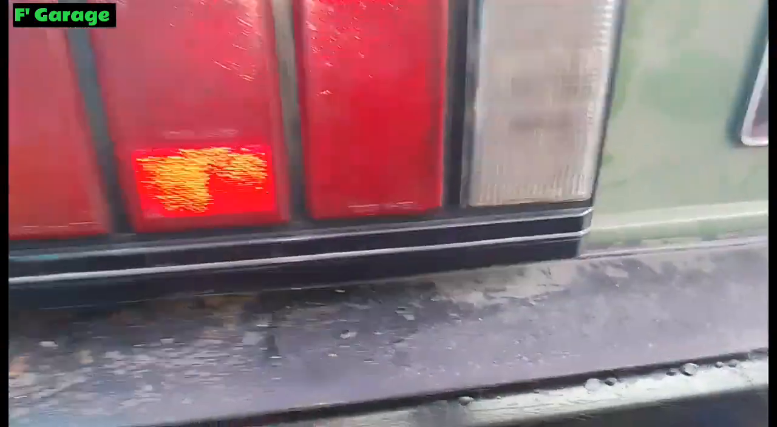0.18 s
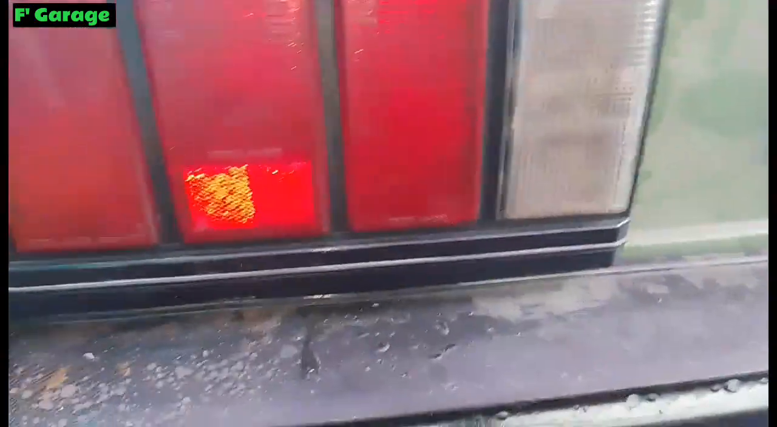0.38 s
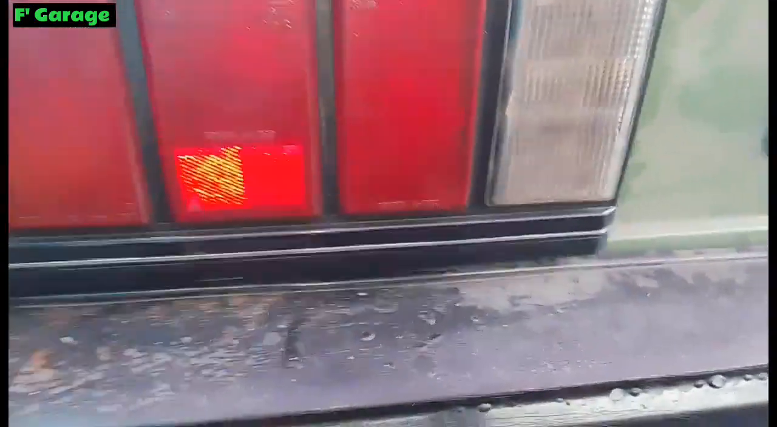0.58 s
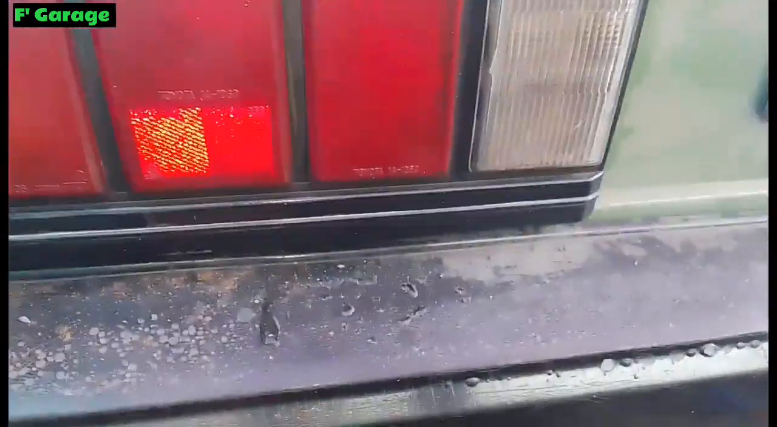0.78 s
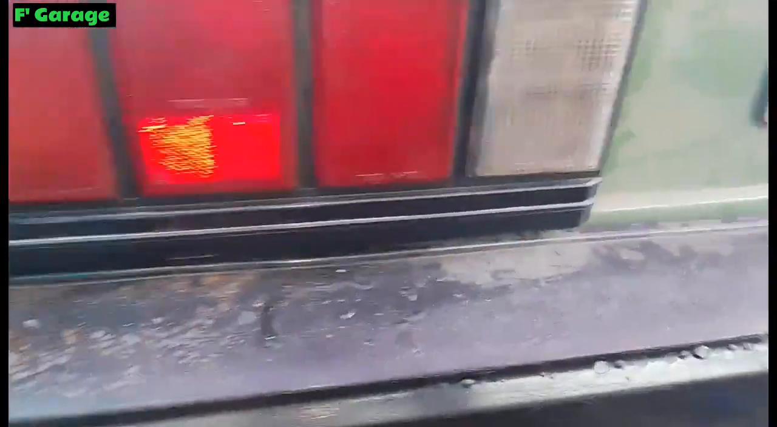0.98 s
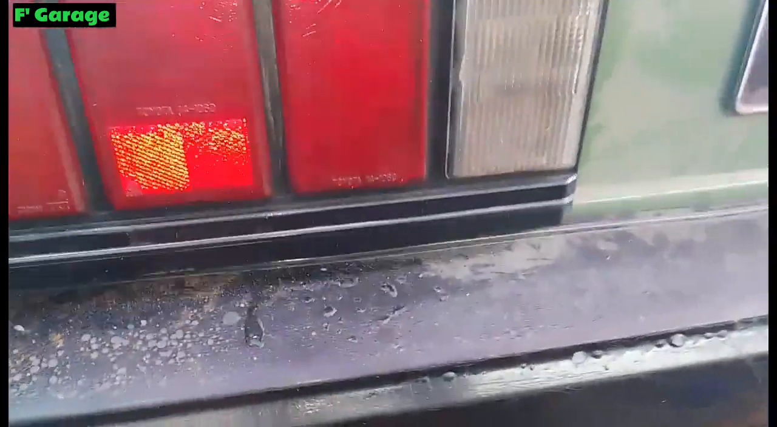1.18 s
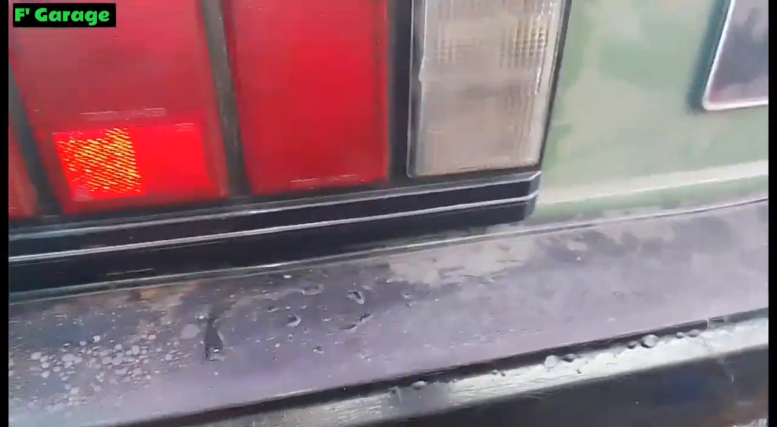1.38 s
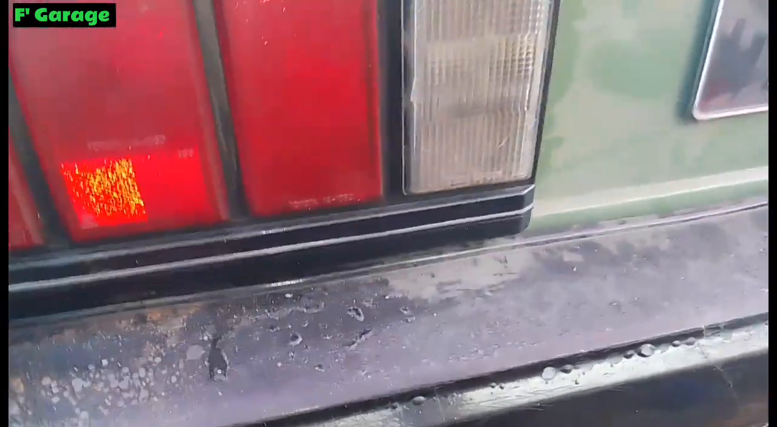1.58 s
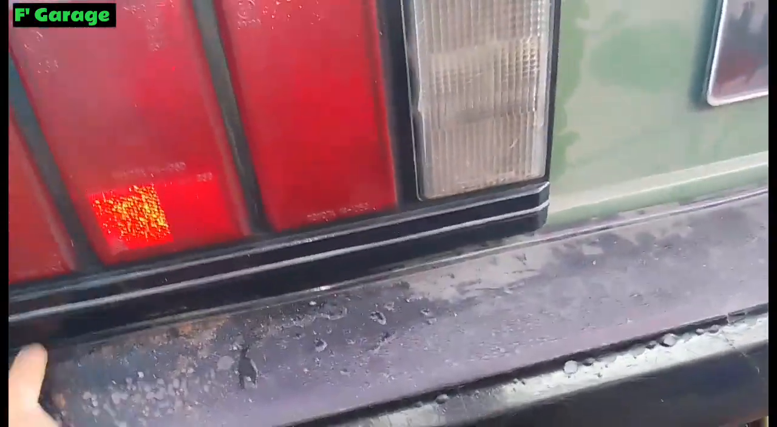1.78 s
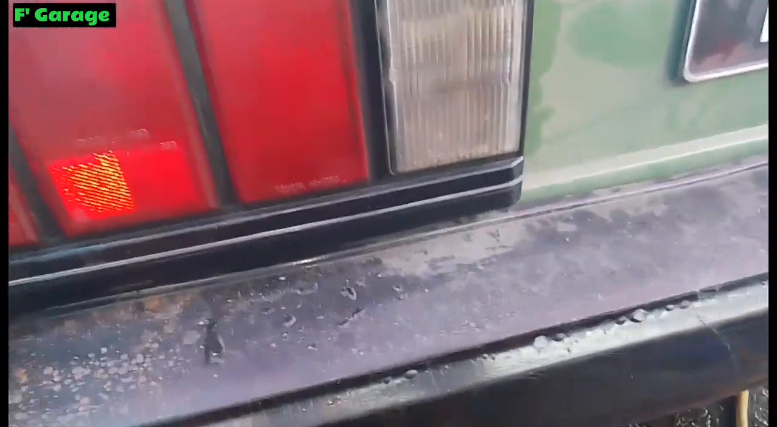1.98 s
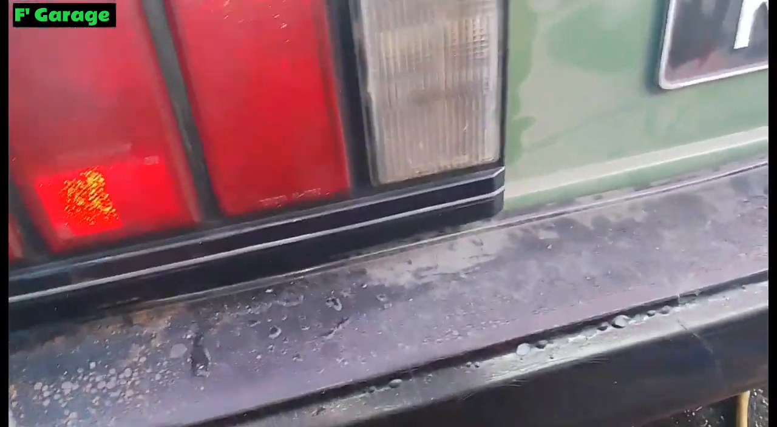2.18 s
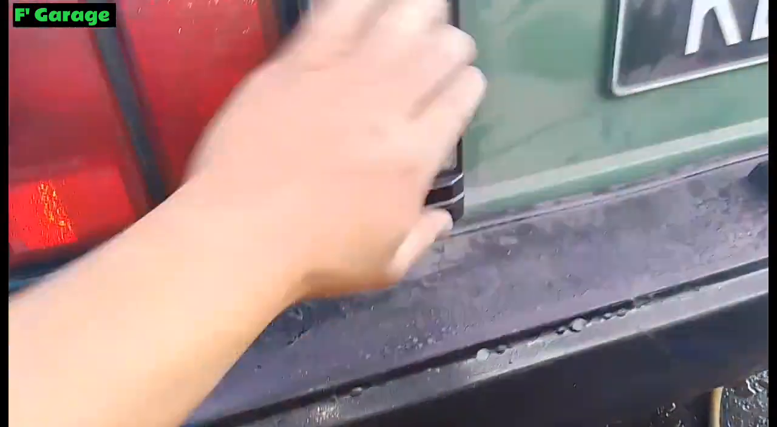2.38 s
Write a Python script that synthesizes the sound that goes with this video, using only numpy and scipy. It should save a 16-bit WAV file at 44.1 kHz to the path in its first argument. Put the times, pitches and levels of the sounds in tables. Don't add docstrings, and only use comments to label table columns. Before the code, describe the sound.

Rapid sharp knocks on hollow plastic car lamp lenses, a pause, then a quick finger slap

```python
import sys
import numpy as np
from scipy import signal
from scipy.io import wavfile
from scipy.ndimage import uniform_filter1d

SR = 44100
rng = np.random.default_rng(int(sys.argv[2]) if len(sys.argv) > 2 else 0)


def how_loud(loudness_db):
    steps = np.asarray(loudness_db, float) / 20
    return 10 ** steps


def to_wav(sig):
    pcm = np.clip(np.atleast_2d(sig), -1, 1) * 32767
    pcm = np.round(pcm).astype(np.int16)
    wavfile.write(sys.argv[1], SR, pcm.T)


N = 108045

# start_s, level_db, thud_db, edge_db, knock_db
TAPS = [(0.046, -22.5, 4, -5, 2), (0.055, -14, 9.5, -9.5, -18), (0.075, -19, 14.5, -3.5, -16),
        (0.192, -13.5, -8, -11, -6), (0.226, -13, 11, -12, 9), (0.232, -9, 11, -1.5, -10),
        (0.28, 2.5, -28, 0, 7.5), (0.354, -4, 4, -1.5, -13), (0.367, -10.5, 13, -2, -9),
        (0.397, -9, 4.5, 7.5, -1), (0.512, -33.5, 26.5, -10, 19), (0.552, -7, -22, -2, 2),
        (0.563, -13.5, -26, -13, 6), (0.581, -6.5, 6.5, 12.5, -17), (0.607, -0.5, -13, 4.5, 2),
        (0.677, -11.5, -8, 6, 12.5), (0.727, -6, 7.5, 1.5, 3.5), (0.94, -4.5, 2.5, 6, 1.5),
        (0.952, -18, -5, -19, 12), (0.957, -9.5, 14, 8, -22), (0.963, -4.5, -3.5, -2, 1.5),
        (0.981, -10, -14, -28, -27),
        (1.053, -8.5, 7.5, 1, -4), (1.068, -14, 9, 2.5, 4), (1.076, -10, 12.5, 5, -2),
             (1.094, -12, -3, 0, -23), (1.114, -4.5, -5, 0.5, -5.5), (1.237, -13.5, 8.5, -4, 2.5),
             (1.252, -6, -9, 7, -5), (1.271, -11.5, 13, 5, -15), (1.335, -13.5, 15.5, -18, 8.5),
             (1.362, -14, 7, 6.5, -5), (1.386, -10, 10.5, 3, 5), (1.433, -7.5, 1, -14, 10.5),
             (1.597, -29, 11, -1, 1.5)]
# start_s, level_db, chatter_s, knock_db, edge_db
CHATTER_BLOWS = [(.058, -29.5, 0.029, 7, -15), (.195, -24, 0.083, 3.5, -7.5), (.244, -3, 0.022, 1, 6),
                 (.282, -6, 0.012, -0.5, 1.5), (.300, -19.5, 0.049, -0.5, -5.5),
                 (0.358, -16.5, 0.041, 2, -4.5), (.551, -16, 0.0073, 0.5, -0.5),
                 (0.579, -3.5, 0.0098, 1.5, 2), (0.61, -11.5, 0.0051, 11.5, 3), (.677, -3.5, 0.024, -1, 6),
                 (0.945, -10, 0.021, -1, 1), (1.054, -15.5, 0.068, 2.5, -5),
                 (1.254, -9.5, 0.069, -1.5, -1.5), (1.304, -4, 0.016, -2, 4),
                 (1.340, -26.5, 0.031, 10.5, -3), (1.386, -3.5, 0.029, 1, 5)]
# start_s, level_db, thud_db, edge_db, knock_db
FINGER_SLAP = [(2.100, -30, 18, -8, 11), (2.104, -32, 20, -14, 11), (2.121, -24.5, -16, 4, 5.5),
               (2.152, -7.5, 3.5, 0, -12), (2.155, -10, 8, -3, -25), (2.162, -3, 2.5, 2.5, -16),
               (2.172, -9, 1, 0.5, -4), (2.177, -12, -6, -5, 2), (2.188, -8, -4, 0, -0.5),
               (2.197, -26, 7.5, -9, 0), (2.207, -33, 9, -17, -7)]
# start_s, pitch_hz, level_db, driven_s
STANDOUT_MODES = [(.246, 1870, -11.5, 0.0061), (.254, 2128, -8.5, 0.0091), (.250, 4840, -20, 0.013),
                  (.264, 753, -16, 0.0088), (0.271, 5670, -26, 0.024), (.280, 630, -12.5, 0.0083),
                  (.294, 620, -14, .003), (.551, 2060, -20, 0.0067), (.233, 4800, -39, .01),
                  (.236, 1930, -26, 0.009), (.965, 5100, -32.5, 0.0057), (.563, 2100, -24, .006),
                  (.578, 773, -10.5, .014), (.579, 555.4, -15.5, 0.039), (.579, 1005, -13.5, 0.015),
                  (.580, 179, -18.5, 0.035), (.581, 1950, -23.5, .024), (0.585, 1686, -19, 0.015),
                  (.605, 764, -18, 0.014), (.679, 943, -15.5, .014), (.680, 1828, -22, 0.017),
                  (0.683, 4620, -26, .018), (0.693, 351.4, -12.5, 0.019), (.698, 800, -17, 0.018),
                  (.940, 332, -18.5, .03), (.944, 802, -23, 0.022), (.955, 1930, -28, 0.023),
                  (1.305, 1942, -16, 0.013), (1.310, 4964, -24.5, 0.012), (1.310, 1410, -22.5, 0.013),
                  (1.312, 2082, -17.5, 0.012), (1.314, 162, -16, 0.025), (1.388, 935, -20, 0.009),
                  (1.390, 2050, -24, .015), (1.392, 1865, -19.5, 0.029), (1.412, 385, -17, 0.013),
                  (2.099, 235, -23, 0.0087), (2.100, 1900, -42, 0.0092), (2.122, 1660, -33, 0.0052),
                  (2.154, 1944, -29, .022), (2.152, 410, -23, 0.0043), (2.171, 388, -16.5, 0.0047),
                  (2.186, 466, -20, 0.0044)]
# pitch_hz, level_db, t60_s
LENS_MODES = [(1279, -4.5, 0.024), (1520, -5.5, 0.033), (1901, -2, 0.033), (2099, -6.5, 0.06),
              (2440, -8, 0.025), (2955, -9.5, 0.054), (3460, -6.5, 0.016)]
# pitch_hz, level_db, t60_s
NEAR_LENS_MODES = [(1260, -24, 0.0053), (1515, -6.5, 0.039), (2060, -3, 0.013), (2256, -0.5, 0.015),
                   (2865, -7.5, 0.06), (3470, 4, 0.0073)]
# pitch_hz, level_db, t60_s
HOUSING_MODES = [(563, -4.5, 0.037), (627.6, -1, 0.039), (778, 1, 0.048), (876, -5.5, 0.038),
                 (1002, -6, 0.039)]
# pitch_hz, level_db, t60_s
PANEL_MODES = [(72.4, -5, 0.24), (112, -5.5, 0.13), (163, -1, 0.1), (248, 0, 0.11), (335.9, 1.5, 0.13),
               (406, 2.5, 0.084), (495, 3.5, 0.043)]
# pitch_hz, t60_s, level_db
GARAGE_TAIL = [(58, 0.49, -5), (200, 0.42, -5.5), (584, 0.31, -9), (2000, 0.28, -10.5), (5300, 0.36, -15),
               (12300, 0.29, -17)]
# pitch_hz, level_db (per Hz)
AIR_SPECTRUM = [(25, 18.5), (40, 9), (160, -1), (500, -6), (1200, -16.5), (3200, -20.5), (7000, -22),
                (15000, -38.5)]
# pitch_hz, width_hz, boost_db
MIC_RESONANCES = [(1993, 790, 8.5), (4990, 750, 14), (5870, 1470, 13)]

RUSTLE_AT_S, RUSTLE_LENGTH_S = 1.826, 0.09


def band(x, lo_hz, hi_hz):
    return signal.sosfilt(signal.butter(2, [lo_hz, min(hi_hz, 20000)], "band", fs=SR, output="sos"), x)


def fade(t, t60_s):
    return np.exp(-np.log(1000) * t / max(t60_s, 1e-3))


def walk(rate_hz):
    hold = int(SR / rate_hz)
    steps = np.repeat(rng.standard_normal(N // 50), hold)[:N]
    return 1.04 * uniform_filter1d(uniform_filter1d(steps, hold), hold)


def add(out, at_s, x):
    i = int(at_s * SR)
    out[i:i + len(x)] += x[:len(out) - i]


def knocks():
    out = np.zeros(N)
    for at_s, db, *colour in TAPS:
        add(out, at_s, how_loud(db - 6) * strike(LENS_MODES, *colour))
    for at_s, db, length_s, knock_db, edge_db in CHATTER_BLOWS:
        answer = strike(LENS_MODES, knock_db / 2, edge_db, knock_db)
        add(out, at_s, how_loud(db) * signal.fftconvolve(chatter(length_s), answer))

    near_low_cut_hz, near_air_db = 147, 4.5
    for at_s, db, *colour in FINGER_SLAP:
        slap = strike(NEAR_LENS_MODES, *colour, near_air_db, rise_s=0.0003)
        add(out, at_s, how_loud(db) * band(slap, near_low_cut_hz, 22000))
    buzz = signal.fftconvolve(chatter(0.045), strike(NEAR_LENS_MODES, 0, -1.2, -2.2, near_air_db))
    add(out, 2.152, how_loud(-11) * band(buzz, near_low_cut_hz, 20000))

    for at_s, hz, db, driven_s in STANDOUT_MODES:
        add(out, at_s, how_loud(db) * standout(hz, driven_s))
    return out


def strike(lens, thud_db, edge_db, knock_db, air_db=-5.5, rise_s=0.0016):
    t = np.arange(SR // 8) / SR
    push = np.hanning(int(0.00092 * SR) + 3)
    thud = np.convolve(ring(PANEL_MODES, t), push / push.sum())[:len(t)]

    attack = np.minimum(t / rise_s + 0.27, 1)
    crack = how_loud(-2.5) * rng.standard_normal(len(t)) * fade(t, 0.021) * attack
    fizz = how_loud(-12) * band(rng.standard_normal(len(t)), 7500, 18000) * fade(t, 0.054)
    edge_hz, air_hz = 2600, 9520
    edge = band(crack, edge_hz, air_hz) + fizz + how_loud(air_db) * band(crack, air_hz, 23000)

    body = how_loud(-6.5) * ring(lens, t) + how_loud(-8 + knock_db) * ring(HOUSING_MODES, t)
    return body + how_loud(-11.5 + thud_db) * thud + how_loud(-2 + edge_db) * edge


def ring(modes, t):
    cluster, scatter_db, detune = 8, 2, 0.09
    hz, db, t60_s = np.repeat(np.array(modes), cluster, axis=0).T[:, :, None]
    loudness, tuning, polarity = rng.standard_normal((3, len(hz), 1))
    level = how_loud(db + scatter_db * loudness) * np.sign(polarity)
    tone = np.sin(2 * np.pi * hz * (1 + detune * tuning) * t)
    y = np.sum(level * tone * np.exp(-np.log(1000) * t / t60_s), axis=0)
    return y / np.abs(y).max()


def chatter(length_s):
    clicks_per_s, spread_db = 3000, 2.5
    t = np.arange(SR // 5) / SR
    chance, side, force = rng.random((len(t), 3)).T
    clicks = (chance < clicks_per_s / SR) * np.sign(side - 0.5) * how_loud(-spread_db * np.log(force + 1e-4))
    shape = np.minimum(t / 0.0012, 1) * fade(np.maximum(t - length_s, 0), 0.051)
    return clicks * shape / np.sqrt(np.mean(clicks ** 2) * SR / 100)


def standout(hz, driven_s):
    t = np.arange(SR // 6) / SR
    wobble_db = 4 * uniform_filter1d(np.repeat(rng.standard_normal(100), 100)[:len(t)], size=150)
    t60_s = 0.019 + 5.3 / hz
    shape = np.minimum(t / 0.0025, 1) * fade(np.maximum(t - driven_s, 0), t60_s)
    return how_loud(-2.5 + wobble_db) * shape * np.sin(2 * np.pi * hz * t)


def rustle():
    t = (np.arange(N) / SR - RUSTLE_AT_S) / RUSTLE_LENGTH_S
    low_shape = np.clip(t * 12, 0, 1) * np.exp(-np.maximum(t, 0) / 0.6)
    low = band(rng.standard_normal(N), 400, 2300) * low_shape
    high = band(rng.standard_normal(N), 4500, 18000) * np.exp(-((t - 0.45) / 0.45) ** 2)
    grain = how_loud(3.7 * walk(90))
    return grain * (how_loud(-37) * low + how_loud(-47.5) * high)


def garage(x):
    build_s = 0.0015
    table_hz, table_t60_s, table_db = np.array(GARAGE_TAIL).T
    out = 0
    for hz in 50 * 2 ** np.arange(0, 8.4, 1 / 3):
        t60_s = np.interp(np.log(hz), np.log(table_hz), table_t60_s)
        db = np.interp(np.log(hz), np.log(table_hz), table_db)
        edges = hz * 2 ** (-1 / 6), hz * 2 ** (1 / 6)
        energy = band(x, *edges) ** 2
        for keep in fade(2 / SR, t60_s), np.exp(-1 / (build_s * SR)):
            energy = signal.lfilter([1 - keep], [1, -keep], energy)
        noise = band(rng.standard_normal(N), *edges)
        out = out + how_loud(db) * np.sqrt(np.maximum(energy, 0)) * noise / np.std(noise)
    return out


def air():
    swell_db, flutter_db = 0.6 * walk(0.44), 1.5 * walk(30)
    table_hz, table_db = np.array(AIR_SPECTRUM).T
    out = 0
    for hz in 25 * 2 ** np.arange(0, 9.6, 0.5):
        db = np.interp(np.log(hz), np.log(table_hz), table_db)
        flicker_db = 0.37 * walk(12.05)
        db = db + swell_db + min(hz / 4000, 1) * flutter_db + flicker_db
        out = out + how_loud(db) * band(rng.standard_normal(N), hz * 2 ** -0.25, hz * 2 ** 0.25)
    return out * how_loud(-43.5) / np.std(out)


def scene():
    hand = knocks()
    return (hand + garage(hand) + rustle() + air())[None]


def low_pass(x):
    return signal.sosfilt(signal.butter(12, 16480, fs=SR, output="sos"), x)


def record(dry):
    x = dry
    for hz, width_hz, boost_db in MIC_RESONANCES:
        x = x + (how_loud(boost_db) - 1) * signal.lfilter(*signal.iirpeak(hz, hz / width_hz, fs=SR), dry)
    top_hz = 6570
    dull = signal.sosfiltfilt(signal.butter(2, top_hz, fs=SR, output="sos"), x)
    x = dull + how_loud(-20.5) * band(x, top_hz, 15800)

    since_sleeve_s = np.arange(N) / SR - RUSTLE_AT_S - RUSTLE_LENGTH_S / 2
    sleeve = np.exp(-(since_sleeve_s / RUSTLE_LENGTH_S * 1.5) ** 2)
    x = x + how_loud(-66 + 2 * walk(14.4) + 6.3 * sleeve) * band(rng.standard_normal(N), 9400, 13000)

    ceiling, knee = 0.8, 4.0
    x = x / (1 + np.abs(x / ceiling) ** knee) ** (1 / knee)
    x = x - 0.7 * signal.sosfilt(signal.butter(1, 45, fs=SR, output="sos"), x)
    x = signal.sosfiltfilt(signal.butter(3, 17000, fs=SR, output="sos"), x)
    x = signal.sosfiltfilt(signal.butter(10, 15150, fs=SR, output="sos"), x)
    x = x + 0.0048
    return low_pass(x)


dry = scene()
out = record(dry)
to_wav(out)
```